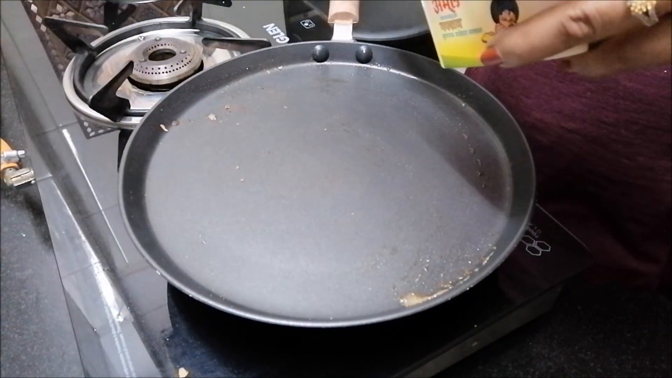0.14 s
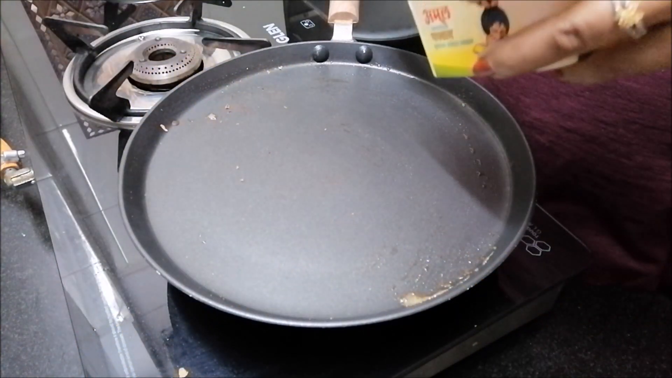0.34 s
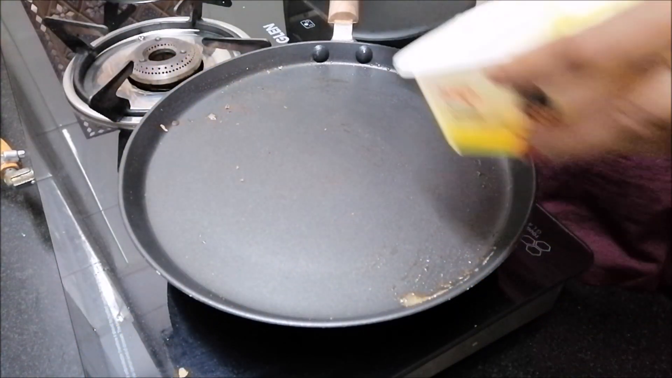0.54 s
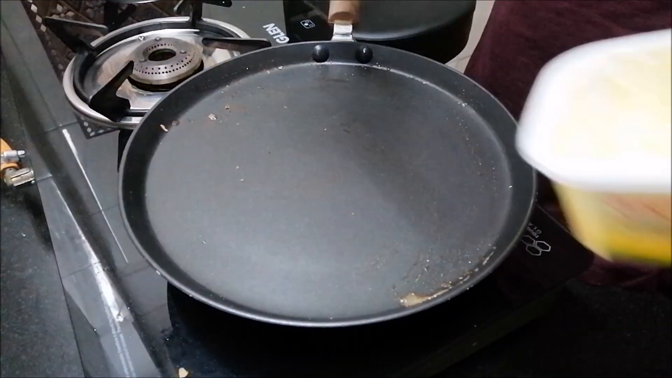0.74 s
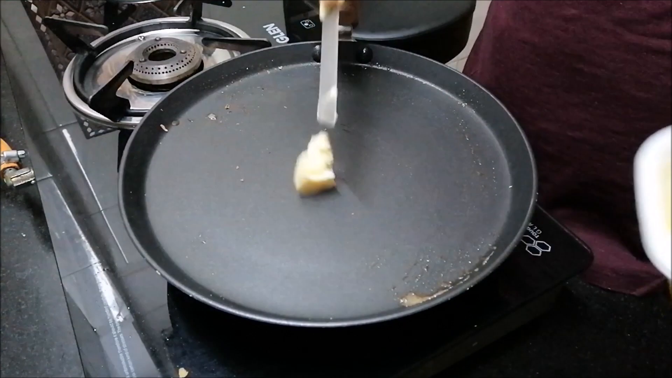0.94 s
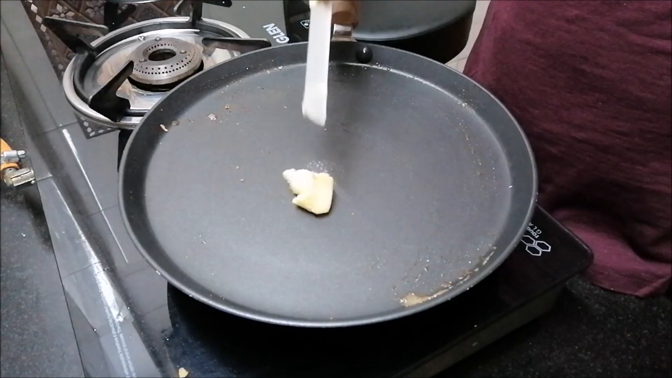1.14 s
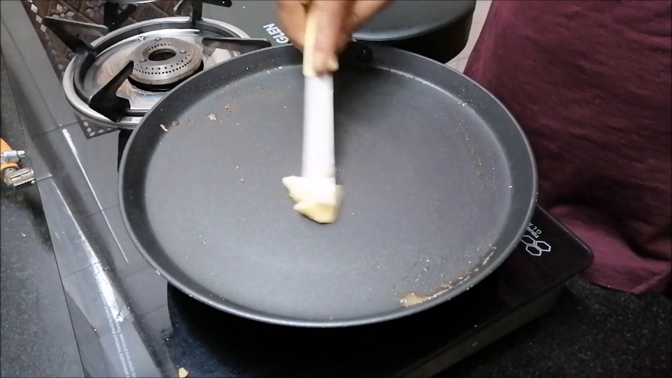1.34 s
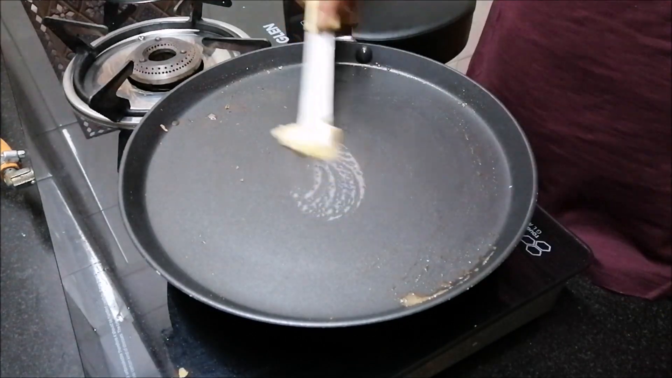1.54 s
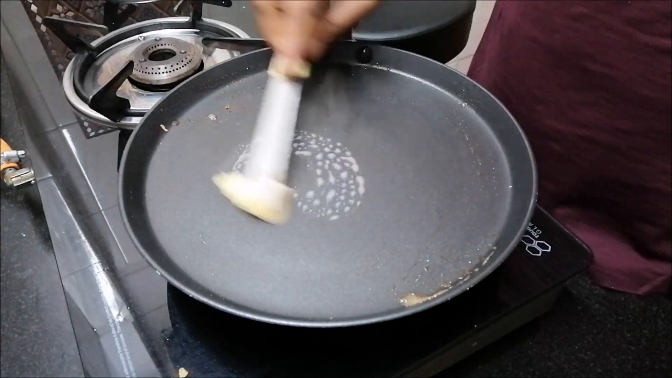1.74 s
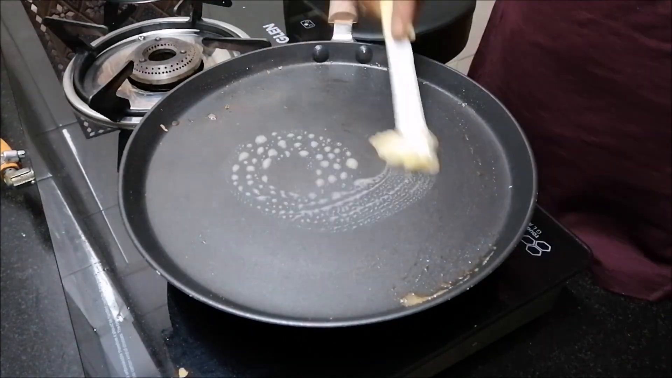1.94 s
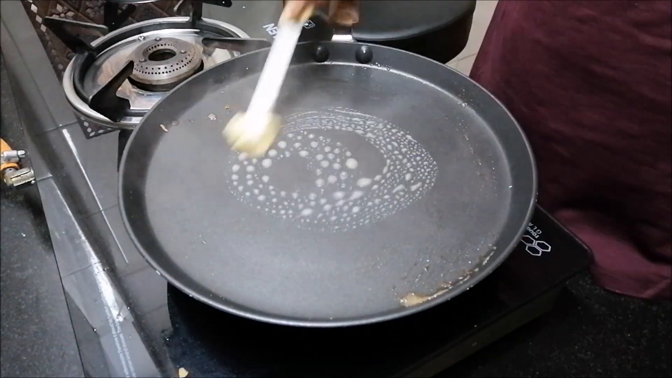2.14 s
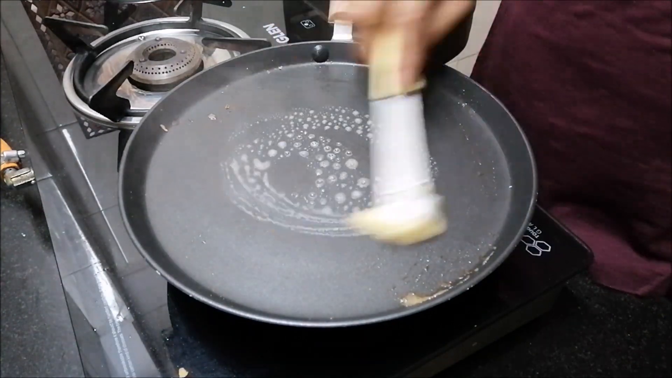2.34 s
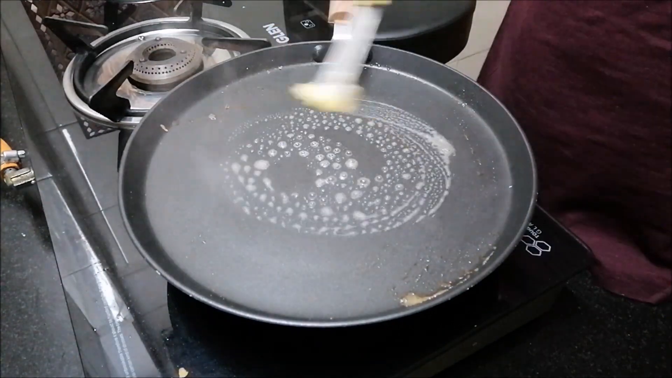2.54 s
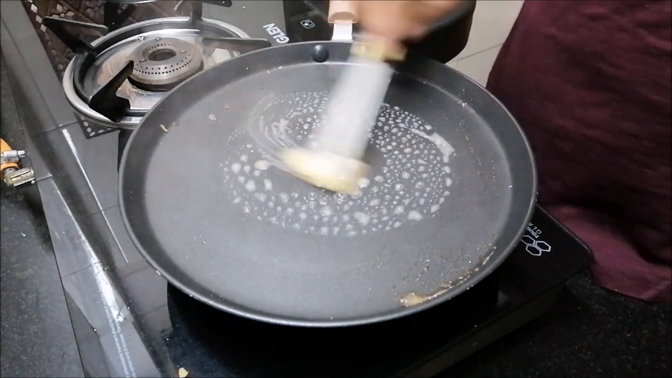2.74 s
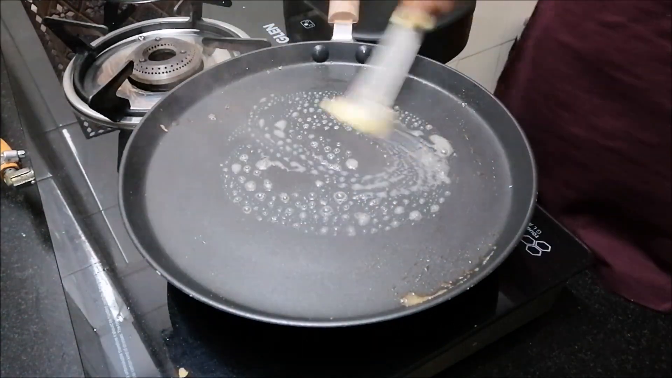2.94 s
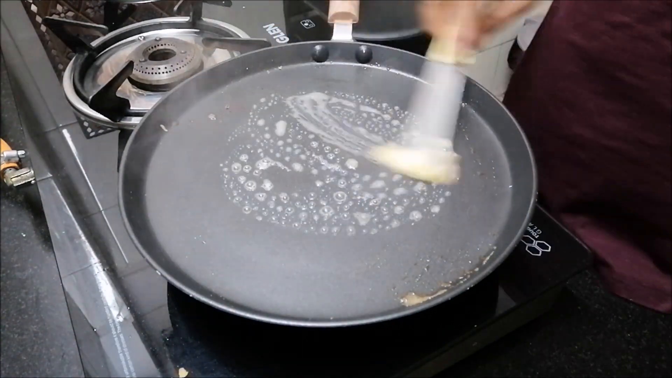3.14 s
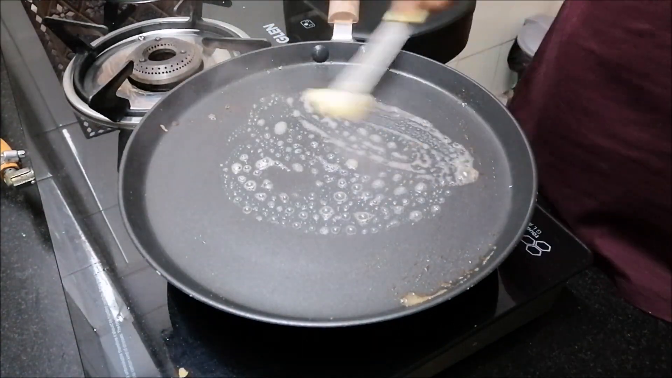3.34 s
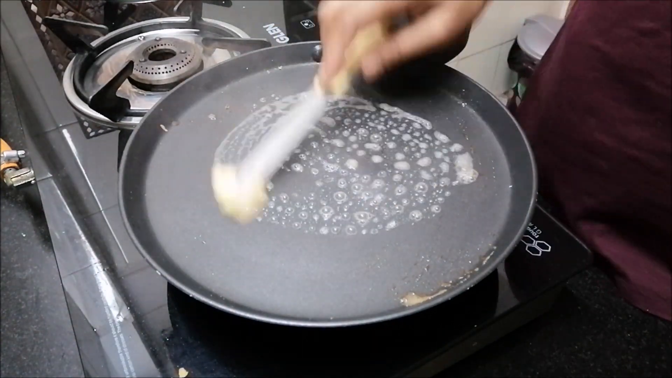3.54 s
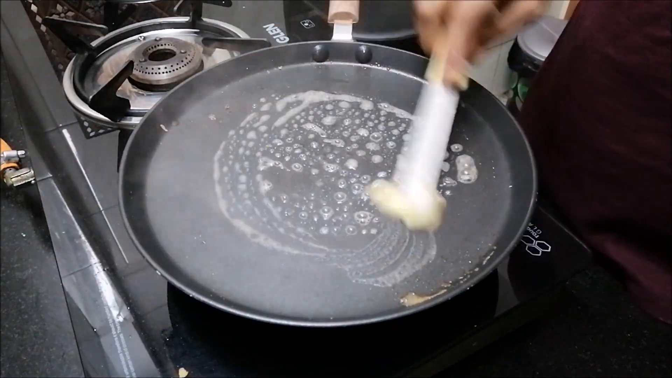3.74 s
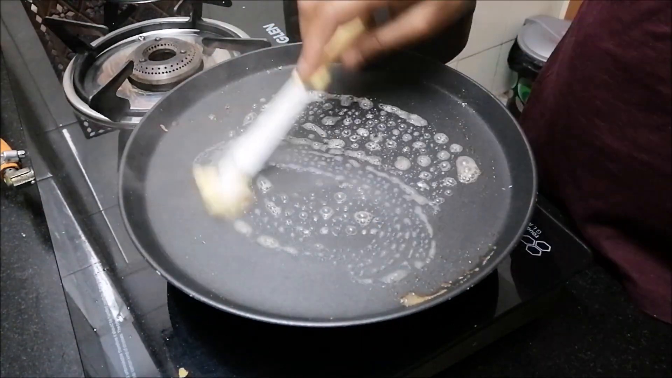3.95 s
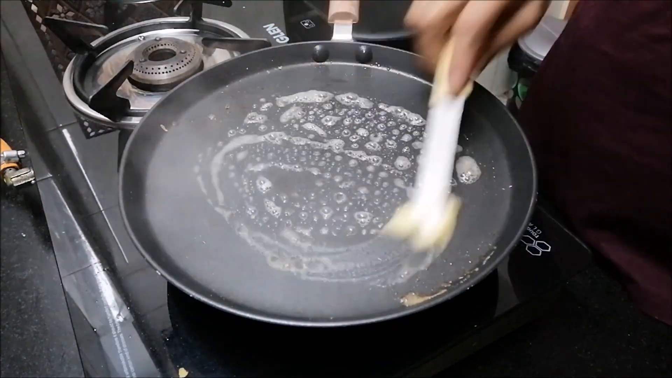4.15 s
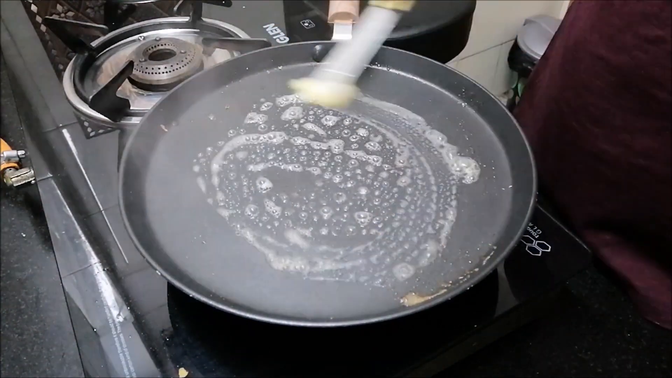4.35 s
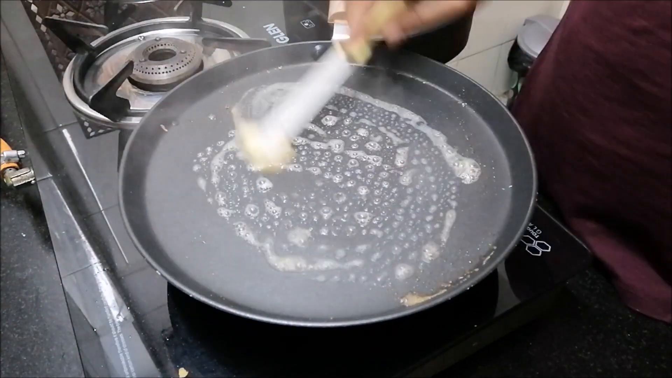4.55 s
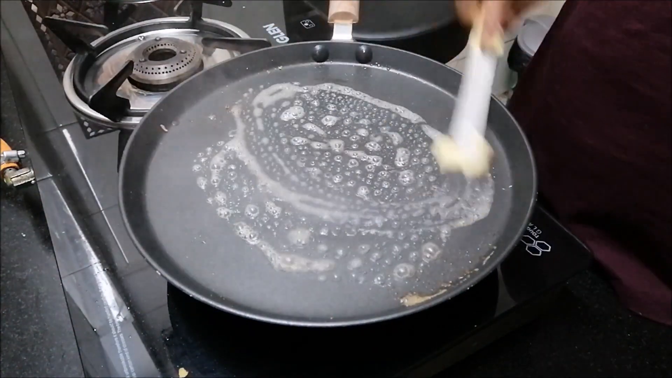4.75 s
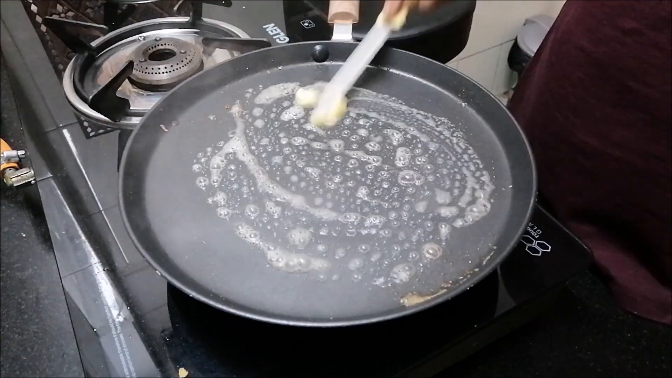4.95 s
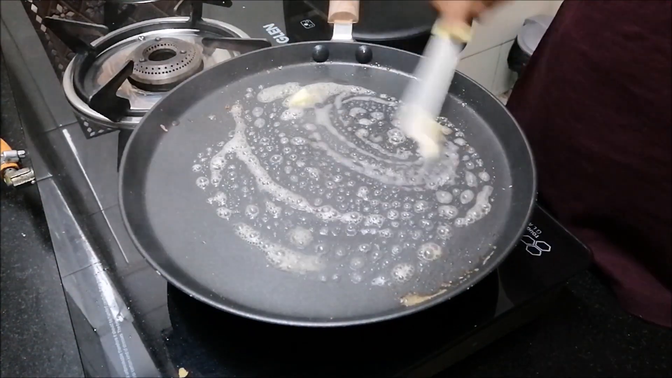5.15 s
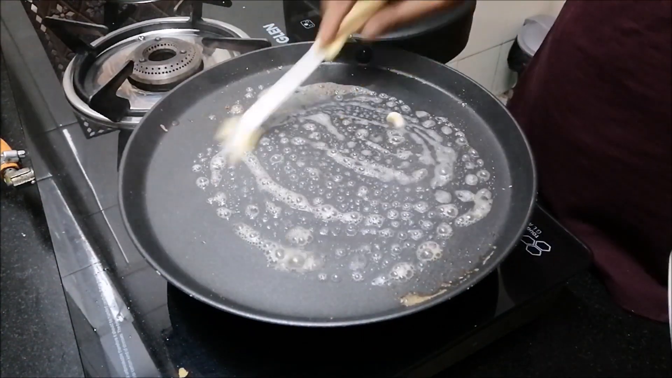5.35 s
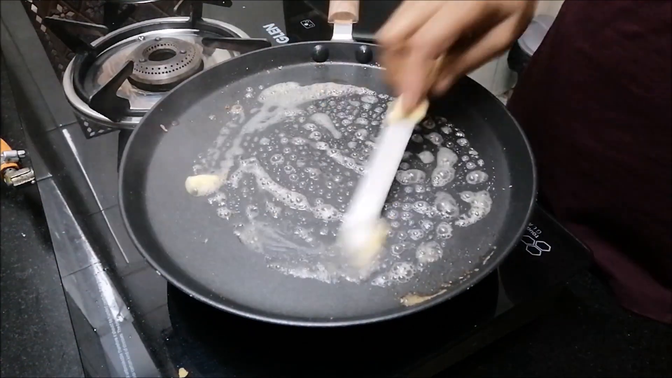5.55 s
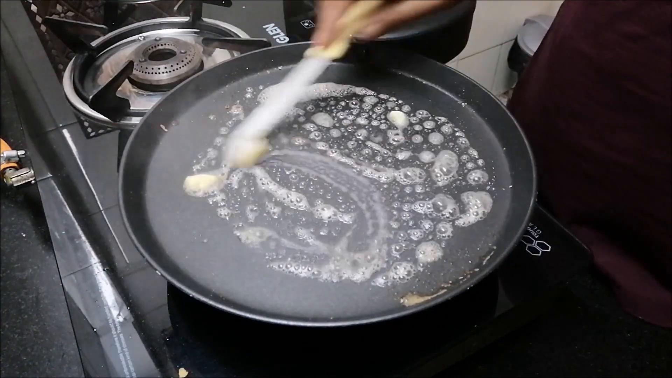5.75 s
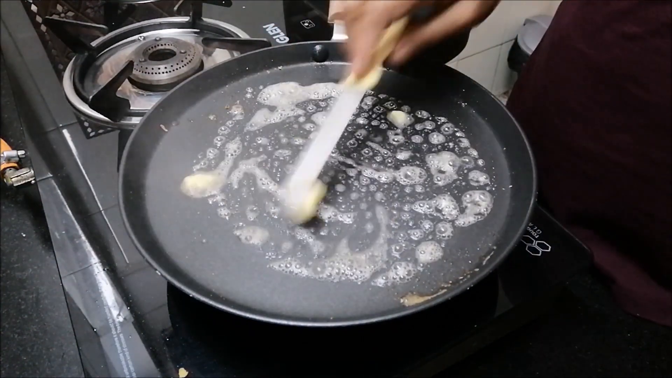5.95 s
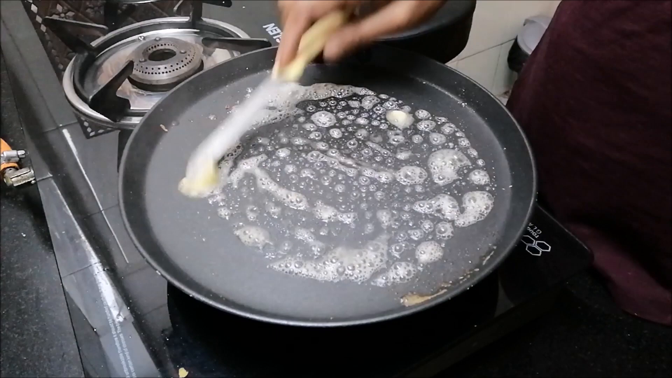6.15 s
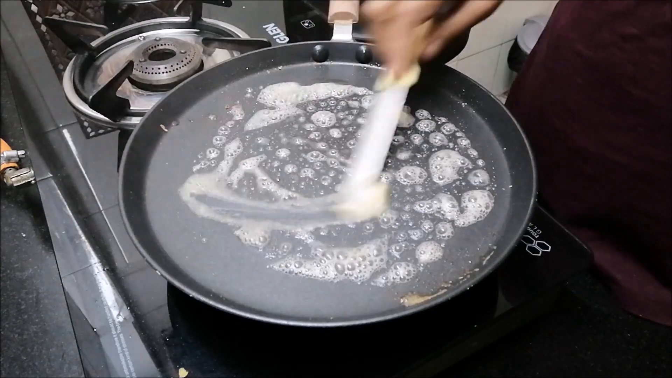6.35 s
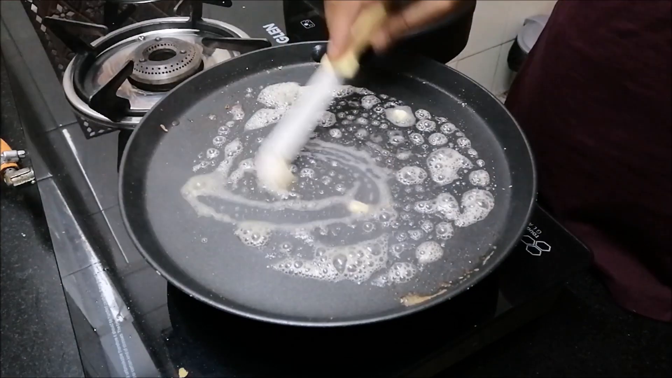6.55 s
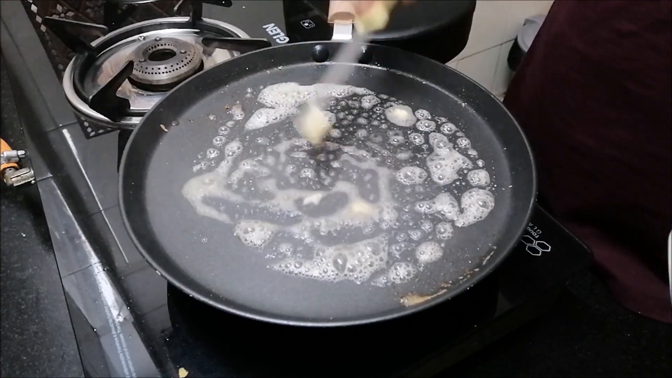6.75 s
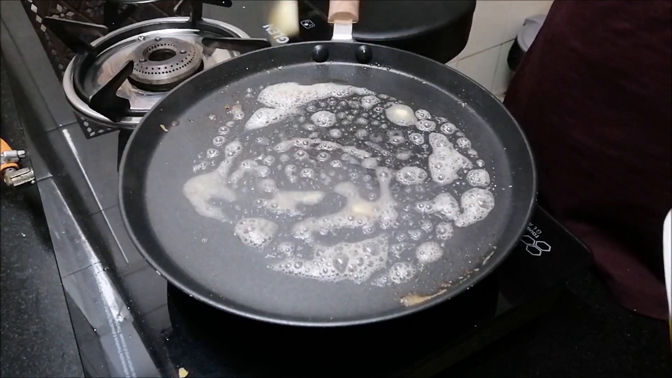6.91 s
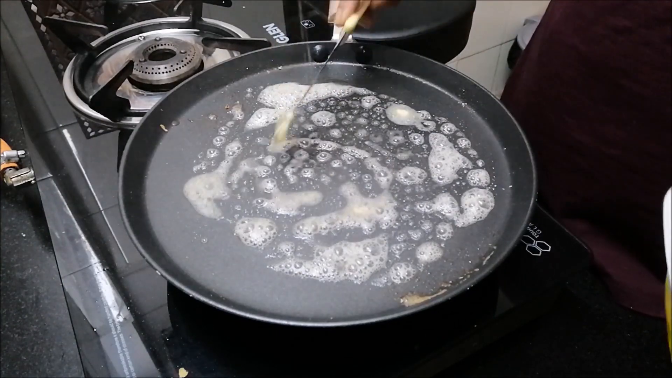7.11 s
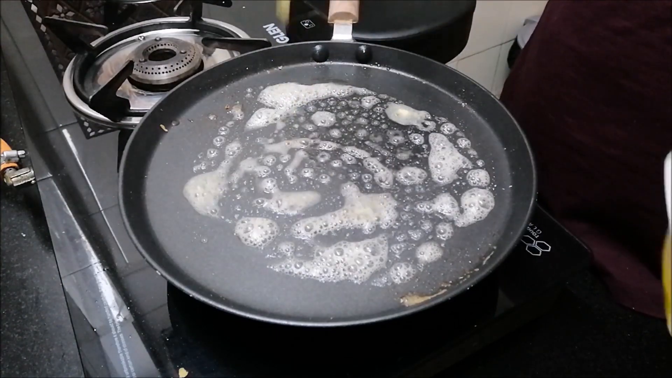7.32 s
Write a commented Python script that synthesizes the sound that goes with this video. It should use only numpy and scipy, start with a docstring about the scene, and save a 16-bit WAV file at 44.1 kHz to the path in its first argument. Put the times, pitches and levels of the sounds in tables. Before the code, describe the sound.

Butter drops onto a hot flat pan with sharp spits, then a bright steady sizzle swells with each wipe of a knife.

```python
"""Butter sizzles on a hot flat pan: its water boils off in thousands of tiny ringing bursts a second.
The knob flashes to steam as it lands, then each wipe of a knife makes the sizzle swell.
Larger drops spit as ticks with a short sputter; the blade's tiny slips ring its modes; contacts are noise puffs.
The induction hob hums, whistles and blows underneath, as sines and coloured noise.
A gain control lifts this quiet bed and turns it down as the sizzle starts."""
import sys
import numpy as np
from scipy import signal
from scipy.fft import rfft, irfft, next_fast_len
from scipy.io import wavfile
from scipy.ndimage import uniform_filter1d, map_coordinates

SR = 44100
rng = np.random.default_rng(int(sys.argv[2]) if len(sys.argv) > 2 else 0)


def put_to_file(sound):
    """Save the sound as 16-bit audio at rate SR, in the file named by the first command-line argument."""
    columns = np.atleast_2d(sound).T  # one column per channel
    safe = np.clip(columns, -1, 1)
    whole_steps = np.round(safe * 32767)
    wavfile.write(sys.argv[1], SR, whole_steps.astype(np.int16))


N = 325458
T = np.arange(N) / SR
TOP_HZ = 15800


def undb(db):
    """Decibels to amplitude gain."""
    return 10 ** (np.asarray(db) / 20)


def unit(x):
    """Scale to rms 1 over all channels."""
    return x / np.sqrt(np.mean(x ** 2))


def shape(x, gain):
    """Filter by a gain that is a function of frequency in Hz."""
    length = x.shape[-1]
    size = next_fast_len(length + 4096, True)
    hz = np.maximum(np.fft.rfftfreq(size, 1 / SR), 1)
    return irfft(rfft(x, size) * gain(hz), size)[..., :length]


def colour(points, hz):
    """Gain of an outline (f/Hz, level/dB), straight in dB over log frequency."""
    f, db = np.transpose(points)
    return undb(np.interp(np.log(hz), np.log(f), db))


def resonance(hz, centre_hz, width_hz):
    """Response of one damped mode, 1 at its centre."""
    return 1 / (1 + 1j * (hz / centre_hz - centre_hz / hz) * centre_hz / width_hz)


def walk(knots_per_s):
    """Random wander, straight between random knots, with a spread near 1."""
    knots = rng.standard_normal(2048)
    return 1.067 * np.interp(T * knots_per_s, np.arange(len(knots)), knots)


def swell(at_s, sigma_s):
    """A soft Gaussian rise and fall around one moment."""
    return np.exp(-.5 * np.minimum(np.abs(T - at_s) / sigma_s, 10) ** 2)


def paths(x, lag, scatter_s, scatter_db, room_t60_s, room_db):
    """Pan to both ports: direct sound (left late by lag samples), scatter off rim and hob, then the kitchen."""
    t = np.arange(SR // 3) / SR
    tails = rng.standard_normal((2, 2, len(t)))
    near = tails[0] * np.exp(-t / scatter_s) * (t > .0002)
    far = tails[1] * undb(-60 * t / room_t60_s) * (t > .003)
    response = (undb(scatter_db) * unit(near) + undb(room_db) * unit(far)) / np.sqrt(len(t))
    response[0, lag] += 1  # the pan lies nearer the right port
    response[1, 0] += 1
    response /= np.sqrt(np.sum(response ** 2) / 2)
    return signal.oaconvolve(x[None], response, axes=1)[:, :len(x)]


def at_ports(hz):
    """Pan sounds are coloured differently at the left and right microphone port; the bass falls away."""
    # relative colour at each port: f/Hz, level/dB
    left_outline = [(500, -59), (1150, -45), (1800, -29), (2150, -26.5), (3100, -19), (3950, -28),
                    (5100, -8), (6200, -11), (7150, 1.36), (8000, -4.5), (9100, -9), (10100, -8),
                    (10800, -10), (13900, -7), (14900, 2.5), (15450, -2), (15750, -10)]
    right_outline = [(500, -44), (1150, -32.5), (1800, -34.5), (2150, -27), (3150, -23), (3950, -29.5),
                     (5200, -15), (6200, -17), (7800, -7.5), (8450, 1.1), (9400, -7), (9950, -4),
                     (10700, -12.5), (14050, -11), (14900, -10), (15650, -15)]
    return np.array([colour(left_outline, hz), colour(right_outline, hz)]) * hz / np.hypot(hz, 400)


def bursts(rate_per_s, spread_db, largest_sigma=1.29):
    """Bubbles burst at random: log-normal sizes with an upper cap; mean power 1."""
    chance = rng.random(N)
    size = np.minimum(rng.standard_normal(N), largest_sigma)
    sign = rng.choice([-1, 1], N)
    hit = chance < rate_per_s / SR
    return unit(hit * sign * undb(spread_db * size) / np.sqrt(rate_per_s))


def hob(fan_db=-64, vents_db=-72.0, whine_db=-77, whine_hz=2275, whine_jitter_hz=44,
        whine_drift_hz=14, wide_hz=450, waver_db=2.5):
    """Fan with a narrow whistle and hissing vents, over low hum and faint high tones; fan bass alike in both ports."""
    # rumble of the fan, relative: f/Hz, density/dB per Hz
    fan_outline = [(15, 7), (30, -12.5), (85, -5), (125, 3.5), (270, -9.5), (420, -9.5), (560, -12.5),
                   (1000, -17.5), (1400, -25.5), (2800, -22), (4000, -31.5), (9000, -28), (16000, -49)]
    # air through the vents, with a microphone ring near 15 kHz, relative: f/Hz, density/dB per Hz
    vent_outline = [(1000, -26), (3900, -16), (5200, -2.5), (6200, 1), (7400, -1.5), (8400, -4),
                    (9600, -9.5), (12000, -15), (14000, -12), (14950, -3), (15700, -15)]
    # low hum tones and faint steady high tones: f/Hz, level/dB
    tone_table = [(119.7, -68.5), (231, -82.5), (324, -105), (371.6, -80), (434, -85.5), (495.3, -90),
                  (650.2, -86.5), (850, -99), (1061, -87), (8320, -99), (9030, -99)]
    mid = shape(rng.standard_normal(N), lambda hz: colour(fan_outline, hz))
    side = shape(rng.standard_normal(N),
                 lambda hz: colour(fan_outline, hz) * (hz + 50) / np.hypot(hz + 50, wide_hz))
    fan = unit(mid + side * np.array([[1], [-1]])) * undb(0.14 * walk(2.9))
    vents = unit(shape(rng.standard_normal((2, N)), lambda hz: colour(vent_outline, hz)))
    jitter_hz = whine_jitter_hz * np.array([walk(200), walk(200)])
    whistle_hz = whine_hz + whine_drift_hz * walk(4.6) + jitter_hz
    whine = unit(np.sin(2 * np.pi * np.cumsum(whistle_hz, axis=1) / SR))
    tones = 0
    for hz, db in tone_table:
        phase = 2 * np.pi * np.cumsum(hz + 2.73 * walk(16)) / SR
        tones = tones + np.sqrt(2) * undb(db + waver_db * walk(17)) * np.sin(phase)
    bed = undb(fan_db) * fan + undb(vents_db) * vents + tones
    return bed * undb([[1.5], [-1.5]]) + undb(whine_db) * whine


def handling():
    """Contacts, from dull bumps and rubs to bright ticks, each a puff of noise in one broad resonance."""
    # contacts of tub, knife and pan: t/s, sigma/s, centre/Hz, width before squaring/Hz, level/dB
    contact_table = [(0.05, .0016, 8100, 9000, -59), (0.102, 0.034, 205, 170, -59.5),
                     (0.122, 0.057, 504, 503, -68), (0.133, 0.051, 1610, 1200, -72.5),
                     (0.38, 0.023, 1900, 2000, -78), (0.496, 0.0015, 12000, 9000, -67),
                     (0.507, 0.003, 9500, 9000, -68), (0.613, 0.047, 200, 100, -64.5),
                     (3.583, 0.023, 696, 400, -67), (4.47, 0.18, 753, 110, -73),
                     (5.758, 0.017, 640, 110, -64)]
    out = 0
    for at_s, sigma_s, centre_hz, width_hz, db in contact_table:
        noise = rng.standard_normal(N) + 1.14 * rng.standard_normal((2, N))  # part common to both ports
        puff = unit(shape(noise, lambda hz: resonance(hz, centre_hz, width_hz) ** 2))
        out = out + undb(db) * swell(at_s, sigma_s) * puff
    return out


def boil(at_s, length_s, attack_s=0.015, release_s=0.028):
    """Butter comes softly to the boil while it is fed to the metal, then dies away."""
    rise = (1 - np.exp(-np.clip(T - at_s, 0, length_s) / attack_s)) ** 2
    return rise * np.exp(-np.maximum(T - at_s - length_s, 0) / release_s)


def boiling():
    """Knob, wipes and film add their power; gives level and coarse, foam and spray shares, in dB."""
    # cold knob grazes the pan, lands, slumps, is nudged, flashing to steam: t/s, length/s, level/dB
    touch_table = [(0.887, 0.03, -57), (0.909, 0.02, -38), (0.925, 0.046, -36.5), (1.031, 0.14, -41.5),
                   (1.17, 0.14, -45.5), (1.344, 0.11, -44.5)]
    # each wipe lays fresh butter on hot metal:
    # t at height/s, sigma/s, level/dB, coarse bubbles re level/dB, finest spray re level/dB
    wipe_table = [(1.642, 0.022, -41, -15.5, -10), (1.857, 0.11, -38.5, -15.5, -4),
                  (2.166, 0.13, -36.8, -22, -5), (2.864, 0.11, -39.5, -15, -1.5),
                  (3.09, .051, -35.5, -22.5, -2.5), (3.233, 0.06, -34.5, -23, -3.6),
                  (3.622, .11, -33.5, -19, -3), (3.753, .083, -39, -19, -4.2),
                  (4.024, 0.16, -35.5, -19, -3), (4.69, 0.2, -35.5, -20, -4), (5.214, .16, -35, -22.5, -4),
                  (5.56, 0.1, -37, -19, -3.5), (5.773, 0.13, -37.5, -18.5, -5),
                  (5.984, 0.076, -42.5, -32, -1.5), (6.527, 0.13, -36.5, -18.5, -3),
                  (6.742, 0.2, -37, -21, -4), (7.263, 0.21, -38.5, -22, -6)]
    melt_s, melt_db = .92, -45.5  # steady boil under the resting knob
    # the film builds up once the wiping starts, then slowly loses its water
    film_s, film_build_s, film_db, film_drying_db_per_s = 1.445, 0.1, -34.5, 0.67
    # coarse, foam and spray shares re level; the film's foam gathers as its spray fades
    knob_shares_db = (-23.5, -12, -3.5)
    wipe_foam_db = -11.5
    film_coarse_db, film_foam_db, film_spray_db = -21, -10.5, -3.5
    spray_fade_s, spray_fade_db_per_s, foam_growth_db_per_s = 4.84, 3.5, 2.5

    parts = [(undb(db) * boil(at_s, length_s), *knob_shares_db) for at_s, length_s, db in touch_table]
    parts.append((undb(melt_db) * boil(melt_s, np.inf), *knob_shares_db))
    for at_s, sigma_s, db, coarse_db, spray_db in wipe_table:
        parts.append((undb(db) * swell(at_s, sigma_s), coarse_db, wipe_foam_db, spray_db))
    film_age_s = np.maximum(T - film_s, 0)
    drying_s = np.maximum(T - spray_fade_s, 0)
    film = undb(film_db - film_drying_db_per_s * film_age_s) * (1 - np.exp(-film_age_s / film_build_s))
    parts.append((film, film_coarse_db, film_foam_db + foam_growth_db_per_s * drying_s,
                  film_spray_db - spray_fade_db_per_s * drying_s))
    power = 0
    for gain, *shares_db in parts:
        power = power + np.array([gain] + [gain * undb(db) for db in shares_db]) ** 2
    level_db, *classes_db = 10 * np.log10(power + 1e-14)
    return level_db, *(db - level_db for db in classes_db)


def sizzle(count=16, full_rate_per_s=380, full_db=-35, spread_db=6.0, spread_db_per_octave=0.5,
           flurry_db=2.5, flurry_per_s=160, ring_width_hz=2000, sputter_db=1.08, sputter_per_s=220,
           drift_db=1.5, drift_per_s=14, wander=0.006, wander_per_s=5):
    """Bubbles burst in flurries, each ringing briefly at its pitch; a weak boil sputters, a strong one is dense."""
    # balance of the boiling patch, drifting from right to left, on top of port colour: t/s, left - right/dB
    balance_table = [(0.93, -3.5), (1.1, -6.5), (2.4, -4.5), (3.75, -4.5), (4.25, -2.5), (4.9, -4),
                     (5.75, -0.5), (6.15, -1.5), (7.2, -0.5)]
    level_db, coarse_db, foam_db, spray_db = boiling()
    pan_db = np.interp(T, *np.transpose(balance_table))
    vigour = undb(np.clip(level_db - full_db, -15, 0))
    sputter = undb(sputter_db * walk(sputter_per_s) / np.sqrt(vigour))
    pitches_hz = np.linspace(1000, 16000, count)
    crackle = 0
    for pitch_hz in pitches_hz:
        octaves = np.log2(pitch_hz / pitches_hz.mean())
        pops = bursts(full_rate_per_s * vigour, spread_db + spread_db_per_octave * octaves)
        flurries = undb(flurry_db * walk(flurry_per_s) + drift_db * walk(drift_per_s))
        pops = pops * sputter * flurries
        rings = signal.lfilter(*signal.iirpeak(pitch_hz, pitch_hz / ring_width_hz, fs=SR), pops)
        lag = rng.integers(8)
        crackle = crackle + paths(rings, lag, scatter_s=0.0022, scatter_db=-2.5, room_t60_s=0.35, room_db=3)
    # the ring of pan and room slides a little as the butter is moved about
    place = np.cumsum(1 + wander * walk(wander_per_s))
    crackle = np.array([map_coordinates(port, [place], order=4, mode="mirror") for port in crackle])
    crackle = crackle * undb(np.array([pan_db, -pan_db]) / 2)

    def band(lo_hz, hi_hz, steepness=28):
        """One size class of bubbles, shading into its neighbours; rms 1."""
        def gain(hz):
            """Port colour between the two edges."""
            edges = (1 + (lo_hz / hz) ** steepness) * (1 + (hz / hi_hz) ** steepness)
            return at_ports(hz) * (hz < TOP_HZ) / edges
        return unit(shape(crackle, gain))

    coarse_top_hz, foam_top_hz, spray_bottom_hz = 4100, 6800, 10800
    coarse = undb(coarse_db) * band(0, coarse_top_hz)
    foam = undb(foam_db) * band(coarse_top_hz, foam_top_hz)
    body_power = np.clip(1 - undb(spray_db) ** 2 - undb(foam_db) ** 2, .1, 1)
    body = np.sqrt(body_power) * band(foam_top_hz, spray_bottom_hz)
    spray = undb(spray_db) * band(spray_bottom_hz, SR)
    return (coarse + foam + body + spray) * undb(level_db)


def spits(count=5, after_db=-5):
    """Larger drops of water explode out of the fat: a pitched sharp tick, then a short sputter of smaller ones."""
    # single spits, faint to loud: t/s, peak level/dB, pitch/Hz, width/Hz, sputter length/s
    spit_table = [(0.896, -49, 7500, 4000, .004), (0.93, -28.5, 8200, 4000, .012),
                  (0.9497, -14.5, 11000, 8000, 0.0022), (1.026, -24.5, 8600, 5000, .009),
                  (1.053, -26, 8500, 6000, .01), (1.1185, -17, 9100, 6000, 0.0065),
                  (1.147, -27, 8400, 4000, 0.0082), (1.235, -20, 8700, 5000, 0.0046),
                  (1.2647, -23, 12500, 8000, .001), (1.282, -28, 11000, 6000, 0.00079),
                  (1.3525, -20, 12000, 7000, 0.0033), (1.3773, -22.5, 8640, 4000, 0.0054),
                  (1.469, -26, 8500, 3000, 0.0059), (1.5169, -27, 8500, 1200, 0.00091),
                  (1.702, -21, 7600, 2000, .001), (1.745, -18, 8950, 3000, .008),
                  (2.5376, -20, 10000, 4000, 0.00085), (2.6872, -15, 9500, 4000, .001),
                  (2.824, -21, 8650, 2000, 0.0062), (3.548, -30, 7300, 1200, 0.0018),
                  (3.628, -19, 8400, 1200, 0.0022), (3.745, -17, 8900, 2500, .01),
                  (3.875, -23, 8500, 2500, .002), (4.5087, -23, 9000, 2000, 0.0011),
                  (5.4173, -19.5, 6700, 900, .002), (5.798, -19, 5930, 1500, .002),
                  (6.98, -22, 7660, 1500, 0.00094), (7.06, -21, 5500, 683, .003)]
    out = np.zeros((2, N + SR))
    size, lead = SR // 8, 64  # samples
    for at_s, db, pitch_hz, width_hz, length_s in spit_table:
        pops = signal.unit_impulse(size, lead)
        later = lead + 1 + (rng.random(count) * length_s * SR).astype(int)
        pops[later] += undb(after_db) * (2 * rng.random(count) - 1)
        tick = paths(pops, 1, scatter_s=0.0015, scatter_db=0.5, room_t60_s=0.24, room_db=-10)

        def gain(hz):
            """Port colour around the pitch, thinned below it."""
            ring = resonance(hz, pitch_hz, width_hz) * hz / np.hypot(hz, pitch_hz)
            return at_ports(hz) * ring * (hz < TOP_HZ)
        tick = shape(tick, gain)
        start = int(at_s * SR) - lead
        out[:, start:start + size] += undb(db) * tick / np.abs(tick).max()
    return out[:, :N]


def blade(rub_db=-69, grip_db=1.5, slip_rate_per_s=2500, slip_spread_db=4, cushion_hz=3600):
    """The knife's uneven pressure and tiny slips ring its modes, dully in butter, brightly on bare metal."""
    # blade against pan, relative: f/Hz, width/Hz, level/dB
    mode_table = [(1150, 46, -18.5), (1620, 70, -20), (2120, 140, -14.5), (2320, 140, -10.5),
                  (3122, 39, 5.5), (5154, 30, 15.5), (6600, 100, -12), (7000, 110, -16)]
    # blade touches down through the butter: t/s, sigma/s, level/dB, share of bare metal/0-1
    scrape_table = [(1.56, .025, -63, 0.1), (3.087, 0.033, -56, .05), (3.452, 0.021, -56.5, .05),
                    (3.533, 0.026, -59, .05), (4.026, 0.055, -61, .1), (5.133, 0.047, -61, .05),
                    (5.323, 0.016, -36.5, 0.94), (5.46, .02, -61, .05), (5.536, 0.017, -53, .05),
                    (5.693, 0.031, -57, 0.2)]
    buttered = undb(rub_db + grip_db * walk(5.5)) * np.interp(T, [1.4, 1.65], [0, 1])
    bare = 0
    for at_s, sigma_s, db, metal in scrape_table:
        force = undb(db) * swell(at_s, sigma_s)
        bare = bare + metal * force
        buttered = buttered + (1 - metal) * force
    slips = np.array([bursts(slip_rate_per_s, slip_spread_db) for _ in range(2)])
    ring = shape(slips, lambda hz: sum(undb(db) * resonance(hz, f, w) for f, w, db in mode_table))
    muted = shape(ring, lambda hz: 1 / (1 + (hz / cushion_hz) ** 6))  # butter mutes the upper modes
    return (unit(ring) * bare + unit(muted) * buttered) * undb([[2], [-3]])


def scene():
    """Everything at the two microphone ports."""
    return hob() + handling() + sizzle() + spits() + blade()


def record(dry, boost_db=8, knee_db=-43, release_db_per_s=.5):
    """Gain control lifts a quiet room, drops at once for a loud sound and recovers slowly; the top is cut."""
    power = uniform_filter1d(np.mean(dry ** 2, axis=0), SR // 100)  # 10 ms mean
    heard_db = 10 * np.log10(np.maximum(power, 1e-12))
    recovery_db = release_db_per_s * T
    held_db = np.maximum.accumulate(heard_db + recovery_db) - recovery_db
    gain = undb(np.clip(knee_db + boost_db - held_db, 0, boost_db))
    return signal.sosfilt(signal.ellip(12, .1, 70, TOP_HZ, fs=SR, output="sos"), dry * gain)


dry = scene()
out = record(dry)
put_to_file(out)
```